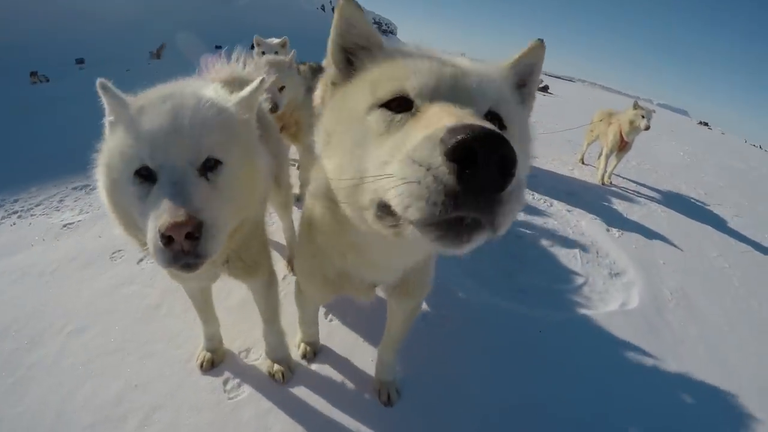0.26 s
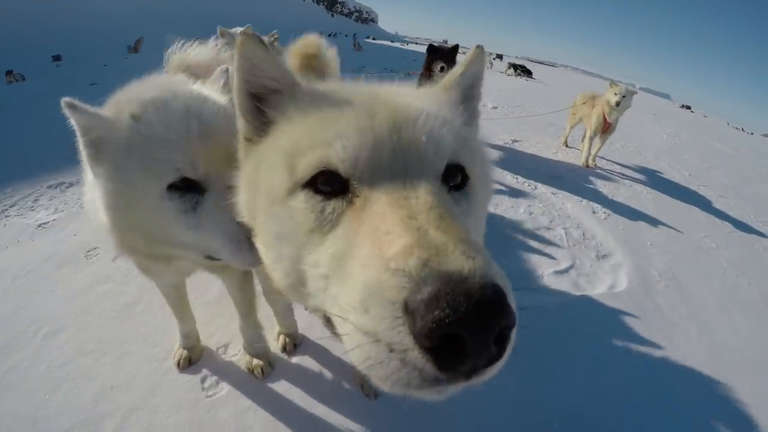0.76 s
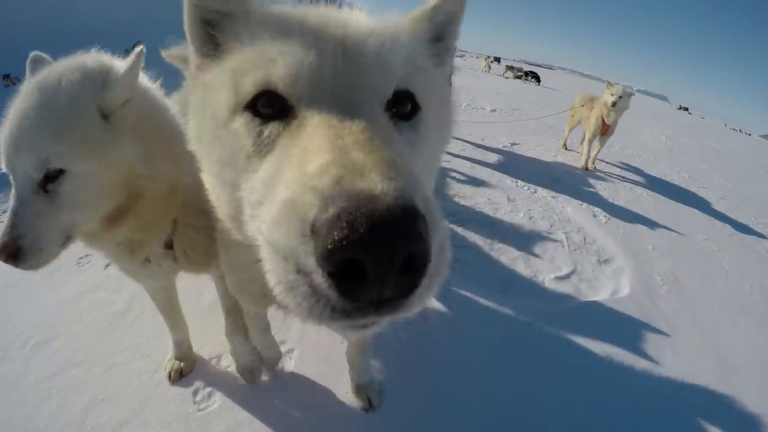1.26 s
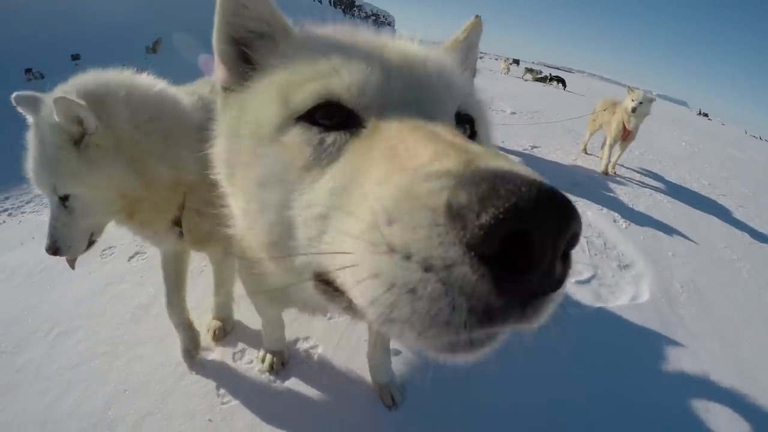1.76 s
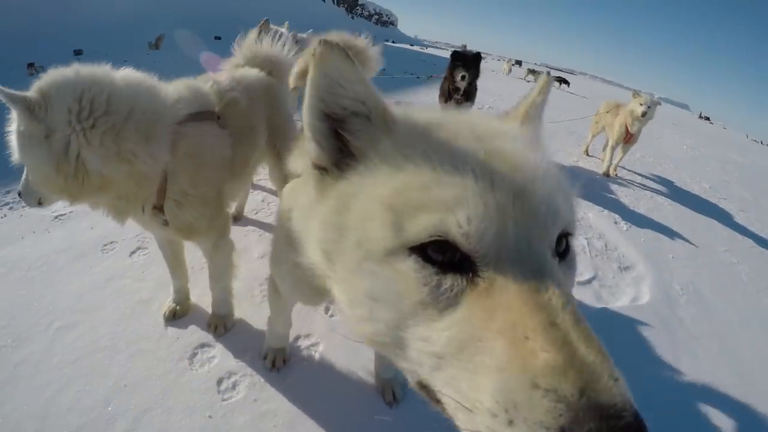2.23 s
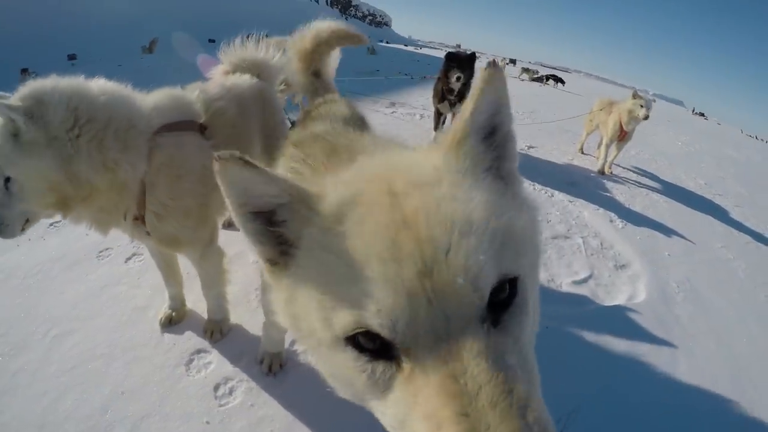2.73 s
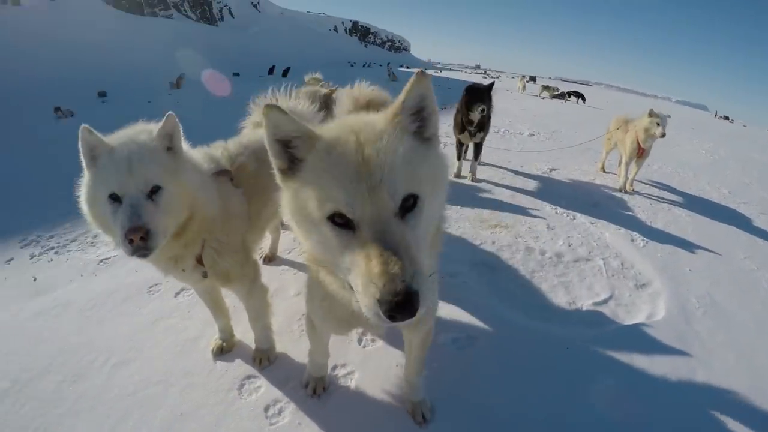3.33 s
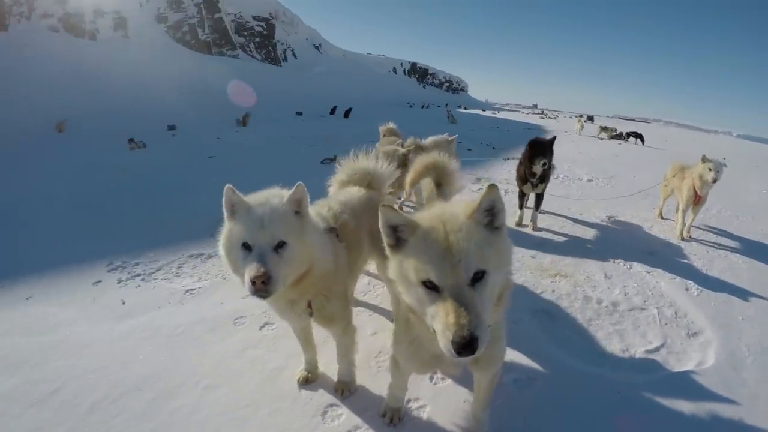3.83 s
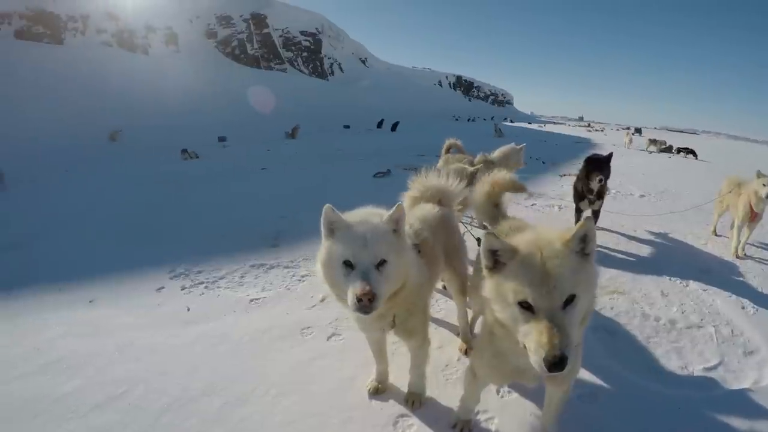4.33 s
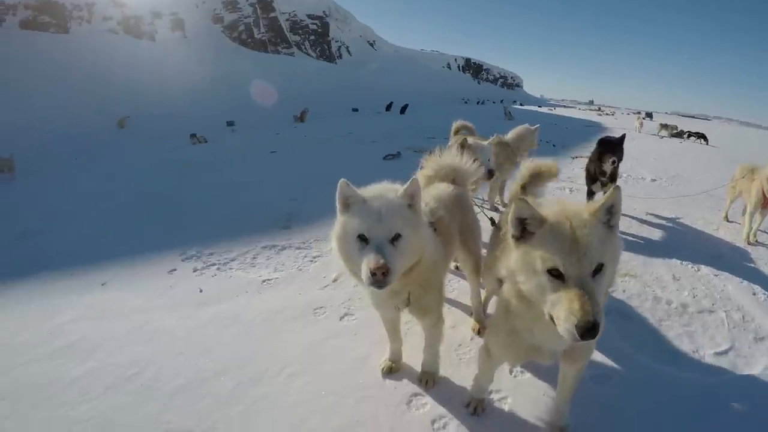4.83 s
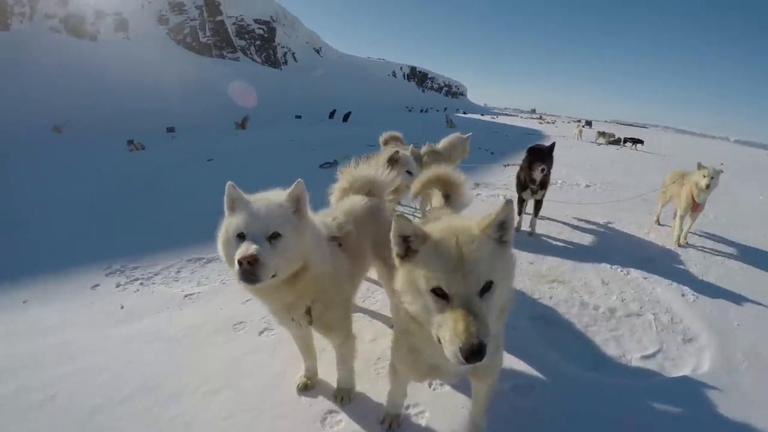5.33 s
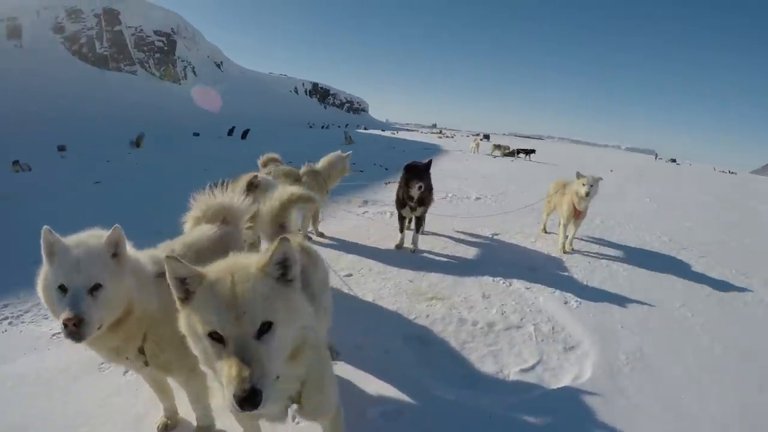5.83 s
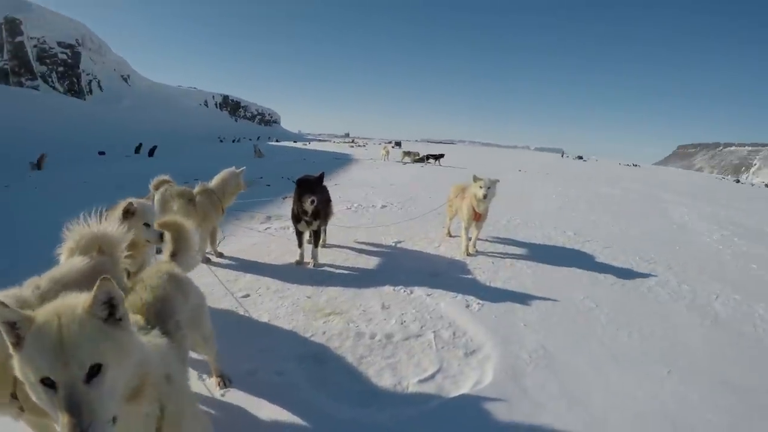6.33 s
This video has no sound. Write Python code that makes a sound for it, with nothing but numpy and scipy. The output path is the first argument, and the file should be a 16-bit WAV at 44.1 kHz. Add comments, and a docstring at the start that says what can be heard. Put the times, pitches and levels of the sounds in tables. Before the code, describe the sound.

Short glassy dog whines and a quick yelp, nosy sniffing, dull knocks and ticking creaks on a handheld camera in still open air.

```python
"""Sled dogs round a camera on a pole

Sled dogs on sea ice whine, yelp and sniff at a small camera: stacks of partials glide between registers,
up to an almost pure falsetto, with thin nasal whistles and puffs of shaped noise.
Nudges ring decaying modes of the housing, and the pole creaks in ticks that chirp downwards.
A snowy slope returns a faint echo by convolution; still air and the grip of a hand lie beneath."""
import sys
import numpy as np
from scipy import signal
from scipy.fft import rfft, irfft, next_fast_len
from scipy.io import wavfile
from scipy.ndimage import uniform_filter1d

SR = 44100
rng = np.random.default_rng(int(sys.argv[2]) if len(sys.argv) > 2 else 0)


def pcm_store(signal):
    """Save signal as 16-bit PCM."""
    levels = np.round(np.clip(np.atleast_2d(signal), -1, 1) * 32767)
    wavfile.write(sys.argv[1], SR, levels.astype(np.int16).T)


N = 290619
TIME = np.arange(N) / SR
FREQ = np.fft.rfftfreq(N, 1 / SR)

# pitch courses of the cries, before throat and nose shape them:
# time_s, pitch_hz, level_db, overtones_db (against the fundamental)
GRUNT = [(0, 1094, -42.5, 4.5), (.025, 782, -29, -16), (.06, 646, -41.5, -8), (.14, 604, -47.5, -14),
         (.23, 581.5, -50, -11), (.29, 517, -58, -10.5)]
FIRST_WHINE = [(0.586, 1172, -26, -11.0), (0.634, 1328, -20, -6), (0.72, 1293, -26, -12),
               (0.774, 1343, -20, -12), (0.837, 1413, -19, -2.5), (0.97, 1389, -18, -6.5),
               (1.03, 1364, -19, -4.5), (1.06, 1294, -21.5, -10.5), (1.08, 1158, -29.5, -8.5)]
YELP = [(1.275, 434.7, -46, -3), (1.3, 495.6, -30, -14.5), (1.332, 596.4, -34.5, 0.5),
        (1.348, 914, -28, -12), (1.37, 929, -28, -13.5), (1.406, 830, -32.5, -9), (1.43, 562.6, -39, 3),
        (1.456, 447, -49.5, -10), (1.54, 360, -43, -26)]
SECOND_WHINE = [(4.754, 1188, -24, -11.5), (4.8, 1321, -20.5, -18.5), (4.87, 1322, -28.5, -16),
                (4.928, 1386, -25, -21), (4.99, 1447, -21.5, -14.5), (5.07, 1440, -25.5, -14.5),
                (5.16, 1428, -21.5, -19), (5.21, 1370, -35.5, 1.5), (5.256, 1353, -33, -12.5)]
THIRD_WHINE = [(5.501, 1129, -28, -17.5), (5.53, 1290, -26.5, -28), (5.575, 1347, -30, -14.5),
               (5.645, 1288, -32, -12.5), (5.72, 1375, -23.5, -20.5), (5.79, 1397, -21, -17),
               (5.855, 1358, -24.5, -13.5), (5.935, 1226, -33, -9.5), (5.978, 1078, -39, 0)]
OPEN_WHINE = [(6.246, 886, -37, -5.0), (6.283, 1156, -46.5, 16), (6.313, 1198, -45.5, 16.5),
              (6.36, 1093, -50, 11.5), (6.413, 1034, -43.5, 2.5), (6.515, 1144, -29.5, -1),
              (6.565, 1189, -30, 0), (6.589, 1135, -28.5, -3.5)]
# resonance of throat and muzzle, shared by every cry: frequency_hz, gain_db
THROAT = [(450, 0), (900, -4.5), (1400, 1.5), (1900, 0.5), (2400, -7), (2650, -14), (2900, -18.5),
          (3500, -19), (4200, -17), (4800, -11), (5600, -20.5), (6500, -24), (7100, -33.5), (8200, -32.5),
          (11000, -43)]
# part of the sound that leaves through the nose: frequency_hz, share (0-1)
NASAL_SHARE = [(3000, 0.04), (4300, 1)]
# the voice at the two ports: frequency_hz, left_lead_rad
PORT_LEAD = [(600, -0.6), (780, 0.7), (920, 3), (1150, 4), (1300, 5), (1405, 6.5), (2150, 9), (2850, 11.5),
             (4250, 14), (4600, 14), (6000, 15.5)]
# the voice at the two ports: frequency_hz, left_minus_right_db
PORT_BALANCE = [(500, 2.5), (1150, 9.5), (1300, 8.5), (1400, 9), (1450, 4), (2100, 6), (2800, 3.5),
                (3600, 11), (4200, 4.5), (5000, 1.5)]
# shift of the fundamental between the ports, moving in the second whine, held before and after:
# time_s, extra_lead_rad
PORT_SHIFT = [(4.9, 1), (4.93, -2), (5, -2), (5.17, -3), (5.25, -0.5), (5.4, 0.5)]
# gravel of the throat in a snort or a voice break: frequency_hz, relative_density_db
RASP = [(300, -35), (900, -26), (1450, 2.5), (2100, 1.5), (3000, 3.5), (3700, -10.5), (4600, -1.5),
        (6000, -9.5), (12000, -55)]
# course of the long nasal whistle: time_s, pitch_hz, relative_level_db
LONG_WHISTLE = [(3.83, 5040, -64), (3.96, 4740, -56), (4.07, 4850, -64), (4.16, 4800, -56),
                (4.345, 4490, -53.5), (4.388, 4600, -40), (4.429, 4380, -46.5)]
# short nasal whistles: start_s, length_s, start_hz, end_hz, peak_db
PEEPS = [(0.024, 0.029, 5000, 4800, -37.5), (0.025, 0.047, 4110, 4350, -41),
         (0.534, 0.029, 4370, 4430, -46), (1.077, 0.053, 4270, 4783, -40), (1.359, 0.045, 4710, 4590, -50),
         (3.937, 0.047, 4730, 4740, -49.5), (4.424, 0.049, 4780, 4820, -53),
         (5.956, 0.039, 4650, 4160, -47)]
# sniffs and puffs: peak_s, length_s, nostril_hiss_db, throat_rush_db (both relative)
SNIFFS = [(0.057, 0.099, -53.5, -45), (0.214, 0.12, -53, -44), (0.322, 0.092, -59.5, -72),
          (1.123, .04, -56.5, -52.5), (1.193, .045, -45, -48), (1.343, 0.15, -52, -45.5),
          (1.493, 0.087, -52, -49.5), (1.656, 0.043, -58.5, -85), (1.814, 0.16, -57.5, -54),
          (2.022, 0.05, -51, -76), (2.1, 0.071, -61.5, -70), (3.144, 0.21, -62, -63),
          (4.756, 0.11, -45, -74), (4.863, 0.082, -63.5, -60)]
# turbulence in the nostrils: frequency_hz, relative_density_db
HISS = [(1200, -6.5), (2500, -4.5), (3600, 0), (4700, 1.5), (5800, -2), (7000, -11), (10000, -25),
        (14000, -39)]
# turbulence in the throat: frequency_hz, relative_density_db
RUSH = [(60, -53), (200, -10), (550, 6), (1000, -11.5), (1700, -1), (2400, -12.5), (3500, -27.5),
        (8000, -39.5)]
# wet clicks of the muzzle: start_s, peak_db
SMACKS = [(0.748, -26.5), (1.173, -30), (1.193, -37), (1.642, -44), (3.064, -35), (3.128, -31.5),
          (3.151, -32)]
# nudges on the housing, before the high-pass: start_s, peak_db, upper_modes_db
NUDGES = [(.331, -19, 14.5), (.629, -21.5, 12.5), (0.768, -39.5, 28), (0.867, -40.5, 1),
          (1.207, -22.5, 14.5), (1.531, -23.5, 10), (1.921, -28.5, 5), (2.071, -35, 4), (2.146, -23, 13),
          (2.959, -32.5, 7.5), (3.171, -35.5, -0.5), (3.334, -38, -3), (3.571, -34.5, -10), (3.655, -35, 1),
          (4.085, -35, -2), (4.438, -29.5, -5), (4.523, -27, 2), (4.662, -34.5, 3), (4.833, -32, 0),
          (5.297, -8, 1), (5.3097, -16.5, 6.5), (5.495, -29.5, -1.5), (5.774, -31.5, -11), (6.556, -24, 1)]
# modes of the housing: frequency_hz, level_db, t60_s
HOUSING = [(159, 3.5, 0.0697), (185.6, 0, 0.1), (244.2, 5.5, 0.029), (263, -5, 0.02), (525, -6.5, 0.019)]
# creaks of the pole: arrival_s (at 1 kHz), level_db, brightness_db_per_octave, left_minus_right_db
TICKS = [(0.0607, -15, -3.5, 1), (0.065, -23.5, -1.5, -20), (0.1526, -18.5, -7, 1), (.330, -28, 0, -6),
         (.531, -28.5, -7.5, 1.5), (0.572, -25, -4.5, 2), (0.769, -26.5, -6.5, 1.5), (1.252, -26, -6.5, 7),
         (1.766, -32.5, -11, 2), (1.829, -29.5, -12, 2), (2.145, -30.5, -6, -1), (3.250, -33, -7.5, 2),
         (3.419, -28, -6.5, 1.5), (3.521, -28, -5, -4.5), (3.571, -27, -6, 4.5), (3.657, -25, -9, 3),
         (3.721, -25.5, -8.5, 1.5), (3.762, -24.5, -5, 4.5), (3.817, -24, -7.5, 2), (3.874, -24, -5, 2),
         (3.947, -26, -6.5, -2), (3.979, -32, -1, -2), (4.01, -30.5, 1, -3), (4.0456, -27.5, -2.5, -2),
         (4.083, -31.5, -1.5, -3), (4.144, -33, -4, 0), (4.241, -22, -4, 6), (5.296, -8.5, -5.5, 6.5),
         (5.492, -30, -19, 2), (5.77, -31.5, -19, 5), (6.144, -33.5, -3, 3), (6.228, -30, -18, 4)]
# spectrum of a creak before its brightness is added: frequency_hz, relative_level_db
TICK_COLOUR = [(100, -26), (220, -3.5), (450, -2), (900, 2.5), (1500, 0.5), (2300, -15.5), (3200, -17),
               (6000, -34), (12000, -86)]
# distinct returns from the ice ridges and the hillside: delay_s, gain_db
RETURNS = [(.09, -31), (.165, -30)]
# scattered tail from the slope: frequency_hz, relative_density_db
TAIL_COLOUR = [(300, 6.5), (1400, -3.5), (3000, -1.5), (7000, -11.5)]
# hiss of still air: frequency_hz, relative_density_db
AIR = [(25, -10), (60, -12.5), (105, -24), (160, -13), (250, -5.5), (500, -11), (1090, -16), (2360, -19.5),
       (4730, -24.5), (9500, -25), (12500, -32), (14900, -42)]
# correlation of the air hiss at the two ports: frequency_hz, likeness (-1 to 1)
AIR_LIKENESS = [(60, .9), (170, -0.95), (300, -0.28), (630, -0.8), (1380, -0.74), (3000, 0.29), (14000, 0)]
# murmur of the hand's grip in the housing: frequency_hz, relative_density_db
GRIP_COLOUR = [(110, -43), (150, 6), (175, 6.0), (215, -3.0), (270, -4.0), (400, -17.0),
               (900, -32), (5000, -77)]

# a whine scoops up out of the chest voice and drops back into it: changes at the far ends
SCOOP_S, SCOOP_OCTAVES, SCOOP_DB, SCOOP_OVERTONES_DB = .036, 0.68, -22, 6.5
DROP_OCTAVES, DROP_DB, DROP_OVERTONES_DB = 1.25, -9, 6
# the voice turns hoarse while it glides through the break between its registers
BREAK_HZ, BREAK_WIDTH_HZ, BREAK_ROUGH, BREAK_OCTAVES_PER_S = 692, 190, 0.66, 9
SNORT_S, SNORT_LENGTH_S, SNORT_DB = .1, 0.11, -40.5
SNIFF_RISE, SNIFF_FALL = 0.63, 0.63  # rise and fall to 1/e, as shares of the length
AIR_DB = -56
TOP_HZ = 14600


def undb(db):
    """Decibels express the logarithm of an amplitude ratio; this inverts it."""
    return 10 ** (np.asarray(db) / 20)


def curves(table):
    """Linear interpolation in time of each column after the first."""
    s, *columns = np.transpose(table)
    return [np.interp(TIME, s, c) for c in columns]


def gate(table, fade=0.0039):
    """Amplitude window: one while a table lasts, with ramps of fade seconds outside it."""
    start, end = table[0][0], table[-1][0]
    return np.clip((TIME - start) / fade + 1, 0, 1) * np.clip((end - TIME) / fade + 1, 0, 1)


def over_hz(points, freq):
    """Linear interpolation on a logarithmic frequency axis."""
    f, v = np.transpose(points)
    return np.interp(np.log(freq + 1), np.log(f), v)


def unit(x):
    """Normalisation to a standard deviation of 1."""
    return x / x.std()


def noise(points):
    """Spectral shaping of white noise, normalised to rms 1."""
    spectrum = rfft(rng.standard_normal(N))
    return unit(irfft(spectrum * undb(over_hz(points, FREQ)), N))


def walk(rate):
    """Low-pass filtered noise: smooth chance of spread 1, up to about rate swings a second."""
    n = next_fast_len(N, real=True)
    low_pass = 1 / (1 + (np.fft.rfftfreq(n, 1 / SR) / rate) ** 4)
    return unit(irfft(rfft(rng.standard_normal(n)) * low_pass, n)[:N])


def pan(db):
    """Constant-power panning: left and right gains of total power 1."""
    g = np.array([undb(db / 2), undb(-db / 2)]).reshape(2, -1)
    return g / np.sqrt((g ** 2).sum(0))


def add(out, s, sound):
    """Superposition: mix a short sound in at time s."""
    i = max(int(s * SR), 0)
    out[:, i:i + sound.shape[-1]] += sound[..., :N - i]


def swell(s, length):
    """Gaussian envelope: a puff of air rises to its peak at time s and fades."""
    width = length * np.where(TIME < s, SNIFF_RISE, SNIFF_FALL)
    return np.exp(-((TIME - s) / width) ** 2)


def course(table, rise_s=None, drop_s=None):
    """Register transition: fast glides near the break are rough; whines scoop for rise_s, drop for drop_s."""
    hz, db, overtones_db = curves(table)
    start, end = table[0][0], table[-1][0]
    if drop_s:
        scoop = np.clip((start - TIME) / SCOOP_S, 0, 1)
        drop = np.clip((TIME - end) / drop_s, 0, 1)
        hz = hz * 2 ** (-SCOOP_OCTAVES * scoop - DROP_OCTAVES * drop)
        db = db + SCOOP_DB * scoop + DROP_DB * drop
        overtones_db = overtones_db + SCOOP_OVERTONES_DB * scoop + DROP_OVERTONES_DB * drop
        start, end = start - rise_s, end + drop_s
    hz = uniform_filter1d(hz, size=300)
    octaves_per_s = abs(np.gradient(np.log2(hz))) * SR
    gliding = np.tanh(octaves_per_s / BREAK_OCTAVES_PER_S)
    rough = BREAK_ROUGH * gliding * np.exp(-((hz - BREAK_HZ) / BREAK_WIDTH_HZ) ** 2)
    return hz, db, overtones_db, gate([(start,), (end,)]), rough


def call(hz, db, overtones_db, sounding, rough, nasal_db, shimmer=0.03, jitter=0.0014, waver=.002,
         rough_jitter=.055, rough_shimmer=0.68, patchy_db=3.0, steady_db=-15, unsteady_range_db=12,
         air_db=-49, half_db=-8):
    """Source and filter: partials of a trembling pitch, weighted by the throat and the nose."""
    out, on = np.zeros((2, N)), sounding > 0
    hz, db, overtones_db, rough = hz[on], db[on], overtones_db[on], rough[on]

    def stretch(chance):
        """Random rotation: a fresh excerpt of a chance signal, as long as the cry."""
        return np.roll(chance, rng.integers(N), axis=-1)[..., on]

    tremble = 1 + waver * stretch(SWAY) + jitter * stretch(QUIVER)
    tremble = tremble + rough_jitter * rough * stretch(FLUTTER)
    phase = 2 * np.pi * np.cumsum(hz * tremble) / SR
    shift = curves(PORT_SHIFT)[0][on]
    # a full voice is steady, a soft one wavers
    unsteady = np.clip((steady_db - db) / unsteady_range_db, 0, 1)
    for k in range(1, 9):
        partial_db = db + over_hz(THROAT, k * hz) + nasal_db * over_hz(NASAL_SHARE, k * hz)
        if k > 1:
            # overtones beam from the muzzle and come and go as the head moves
            partial_db = partial_db + overtones_db + patchy_db * unsteady * stretch(SWAY)
        flutter = 1 + (shimmer * k + rough_shimmer * rough) * stretch(FLUTTER)
        sides = pan(over_hz(PORT_BALANCE, k * hz))
        turn = over_hz(PORT_LEAD, k * hz) + shift * (k == 1)
        wave = np.sin(k * phase + np.array([turn, -turn]) / 2)
        out[:, on] += 2 * undb(partial_db) * flutter * sides * wave
    # in a break strong and weak cycles alternate, which adds a line between the first two partials
    half_line = undb(half_db + db) * 2 * rough * np.sin(3 * phase / 2)
    out[:, on] += pan(over_hz(PORT_BALANCE, hz)) * half_line
    # air rushes past the folds while they sound
    out[:, on] += undb(air_db + db / 2) * stretch(NOSTRILS)
    return out * sounding


def voices(rasp_db=-32.5):
    """Phonation with turbulence: all the cries, hoarse at their breaks, and a snort within the first."""
    # each cry with the strength of its nasal ring in dB; the last is the least nasal
    cries = [(course(GRUNT), -2),
             (course(FIRST_WHINE, rise_s=0.017, drop_s=0.015), -1),
             (course(YELP), -1.5),
             (course(SECOND_WHINE, rise_s=.036, drop_s=0.027), .3),
             (course(THIRD_WHINE, rise_s=0.034, drop_s=.04), -.8),
             (course(OPEN_WHINE, rise_s=.036, drop_s=.03), -8)]
    hoarse = sum(sounding * rough * undb(rasp_db + db / 2) for (_, db, _, sounding, rough), _ in cries)
    snort = undb(SNORT_DB) * swell(SNORT_S, SNORT_LENGTH_S)
    gravel = (uniform_filter1d(hoarse, size=900) + snort) * undb(0.72 * FLUTTER)
    rasp = noise(RASP) + .5 * np.array([[1], [-1]]) * noise(RASP)
    return sum(call(*cry, nasal_db) for cry, nasal_db in cries) + gravel * rasp


def whistles(long_db=-1.5, flutter_db=2.5):
    """Frequency modulation: a much higher wobbling tone from the nose, independent of the voice."""
    hz, db = curves(LONG_WHISTLE)
    wobble = 1 + .004 * walk(150)
    level = undb(db + long_db + flutter_db * walk(45)) * gate(LONG_WHISTLE)
    out = pan(2) * level * np.sin(2 * np.pi * np.cumsum(hz * wobble) / SR)
    for s, length, start_hz, end_hz, db in PEEPS:
        n = int(length * SR)
        glide = np.linspace(start_hz, end_hz, n) * np.roll(wobble, -int(s * SR))[:n]
        add(out, s, undb(db) * np.hanning(n) * np.sin(2 * np.pi * np.cumsum(glide) / SR))
    return out


def sniffs(rush_db=-1, flicker_db=2.5, grain_db=2.0, spread=0.27):
    """Turbulent flow in a nose close by: nostril hiss over a lower rush, both fluttering."""
    hiss = rush = 0
    for s, length, high_db, low_db in SNIFFS:
        puff = swell(s, length)
        hiss = hiss + undb(high_db) * puff
        rush = rush + undb(low_db) * puff
    # moisture in the nostrils makes the flow sputter
    flow = undb(flicker_db * walk(63) + grain_db * walk(450))
    mid, side = (flow * (hiss * noise(HISS) + undb(rush_db) * rush * noise(RUSH)) for _ in range(2))
    return np.array([mid + spread * side, mid - spread * side])


def smacks(t60=.008):
    """Exponential decay of short noise bursts: tiny wet clicks of lips and nose."""
    out, t = np.zeros((2, N)), TIME[:SR // 50]
    for s, db in SMACKS:
        burst = np.roll(NOSTRILS, rng.integers(N), axis=1)[:, :len(t)]
        click = burst * undb(-60 * t / t60)
        add(out, s, undb(db) * click / abs(click).max())
    return out


def nudges(push_s=0.0093, cutoff_hz=125, port_spread_db=3.5):
    """Modal vibration: soft blows ring the housing; a steep high-pass thins the deep bass."""
    out, t = np.zeros((2, N)), TIME[:SR // 5]
    chance = rng.standard_normal((len(NUDGES), len(HOUSING), 3))
    for (s, db, upper_db), row in zip(NUDGES, chance):
        ring = 0
        for k, ((hz, mode_db, t60), (tuning, lean, skew)) in enumerate(zip(HOUSING, row)):
            # each mode reaches the two ports with its own strength and phase
            port_phase = .2 * skew * np.array([[1], [-1]])
            swing = np.sin(2 * np.pi * hz * (1 + .015 * tuning) * t + port_phase)
            decay = undb(mode_db + upper_db * (k > 1) - 60 * t / t60)
            ring = ring + pan(port_spread_db * lean) * decay * swing
        ring = ring * (1 - np.exp(-t / push_s))
        add(out, s, undb(db) * ring / abs(ring).max())
    return irfft(rfft(out) / (1 + (cutoff_hz / (FREQ + 1)) ** 12), N)


def creaks(port_lag_s=0.00042, travel_s=0.0028, size=2048):
    """Dispersion: in a bending wave along the pole treble outruns bass, so each tick chirps down."""
    out, f = np.zeros((2, N)), np.fft.rfftfreq(size, 1 / SR)
    lead_s = size / 4 / SR  # room for the early treble
    octave = np.log2((f + 1) / 700)
    # the grip slips twice in quick succession, which gives each tick its own colour
    gaps = rng.uniform(.0008, .0028, (len(TICKS), 1))
    for (s, db, tilt_db, pan_db), gap_s in zip(TICKS, gaps):
        # the weaker slip comes first and is mostly treble
        two_slips = 1 + .4 * np.exp(2j * np.pi * f * gap_s) * np.clip(f / 1200, 0, 1)
        colour = undb(over_hz(TICK_COLOUR, f) + tilt_db * octave.clip(-1, 2)) * two_slips
        # travel_s is the travel time at 1 kHz; wave speed grows with the root of frequency
        delay_s = lead_s - travel_s + np.array([[port_lag_s], [0]])
        turns = 2 * travel_s * np.sqrt(1000 * f) + f * delay_s
        tick = irfft(colour * np.exp(-2j * np.pi * turns))
        add(out, s - lead_s, np.sqrt(2) * undb(db) * pan(pan_db) * tick / abs(tick).max())
    return out


def slope(x, tail_db=-31.0206, t60=0.68, build_up_s=0.067):
    """Reflection and scattering: the left channel meets two dull returns and a diffuse tail."""
    t = TIME[:SR]
    tails = np.array([noise(TAIL_COLOUR)[:SR] for _ in range(2)])
    tails = tails * undb(-60 * t / t60) * (1 - np.exp(-(t / build_up_s) ** 2))
    tails = undb(tail_db) * tails / np.sqrt((tails ** 2).sum(1, keepdims=True))
    soft = signal.windows.hann(9)
    for s, db in RETURNS:
        # snow swallows the treble of each return
        add(tails, s, undb(db) * soft / soft.sum())
    return signal.fftconvolve(x[:1], tails, axes=1)[:, :N]


def air(grip_db=-54, grip_swing_db=4.0):
    """Partial coherence: even hiss of a still day at two ports, and the hand's murmur in the housing."""
    alike = np.clip(over_hz(AIR_LIKENESS, FREQ), -.95, .95)
    mid = noise(AIR)
    # the ratio of side to mid sets the correlation of the ports
    side = irfft(rfft(noise(AIR)) * np.sqrt((1 - alike) / (1 + alike)), N)
    grip = noise(GRIP_COLOUR) * undb(grip_db + grip_swing_db * walk(6.6))
    return undb(AIR_DB) * np.array([mid + side, mid - side]) + grip


def scene():
    """Superposition of the dogs, their echo, the handled camera and the air."""
    dogs = voices() + whistles() + sniffs()
    return dogs + slope(dogs) + smacks() + nudges() + creaks() + air()


def record(dry):
    """Band limiting: the camera cuts the top with a steep elliptic low-pass."""
    return signal.sosfilt(signal.ellip(8, .2, 70, TOP_HZ, fs=SR, output="sos"), dry)


# chance signals shared by the cries, from fast to slow, and the two ports' nostril hiss
FLUTTER, QUIVER, SWAY = walk(270), walk(140), walk(39)
NOSTRILS = np.array([noise(HISS), noise(HISS)])

dry = scene()
out = record(dry)
pcm_store(out)
```